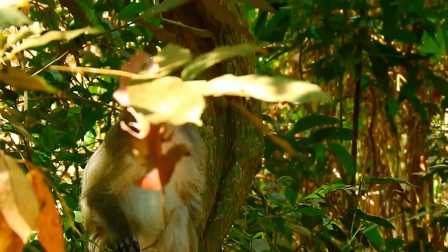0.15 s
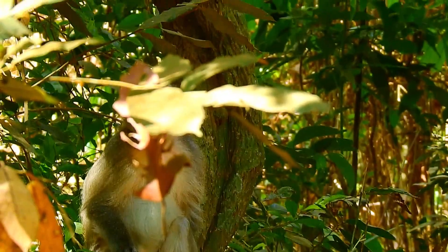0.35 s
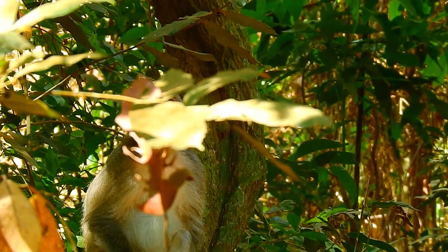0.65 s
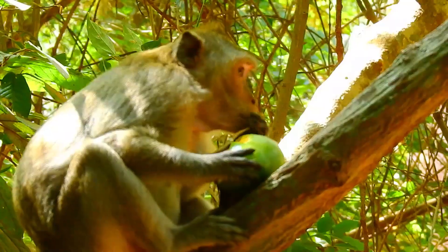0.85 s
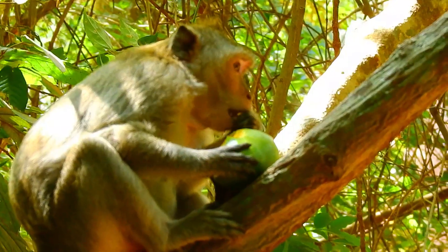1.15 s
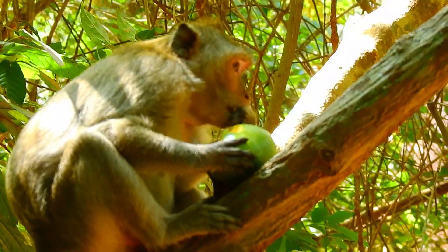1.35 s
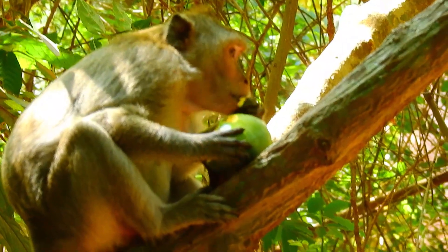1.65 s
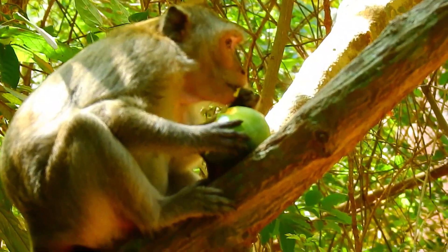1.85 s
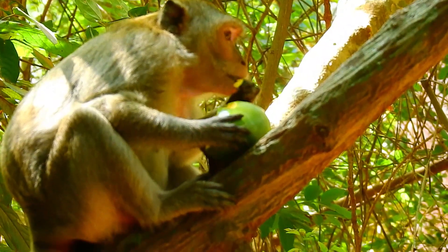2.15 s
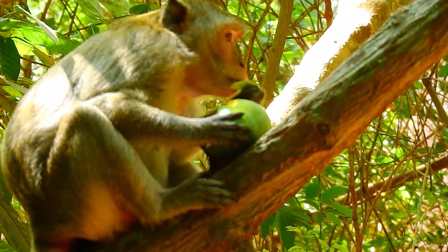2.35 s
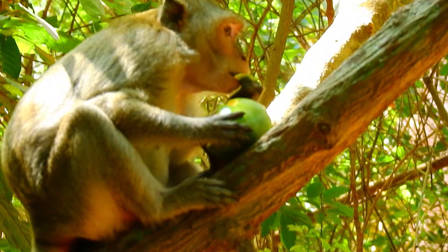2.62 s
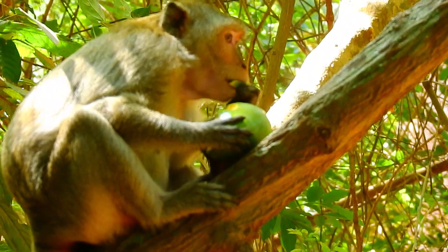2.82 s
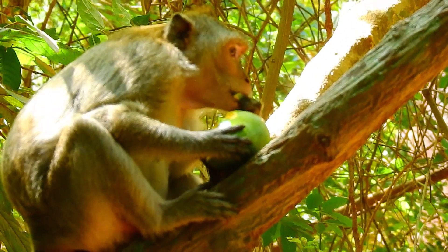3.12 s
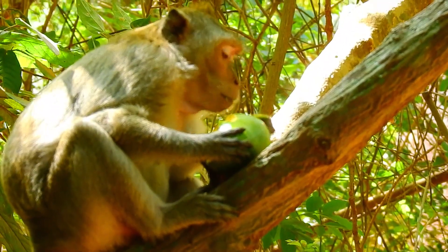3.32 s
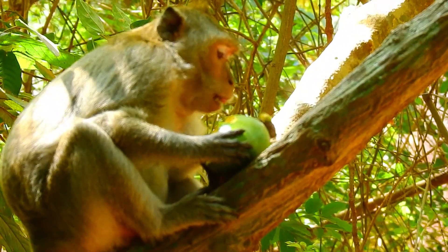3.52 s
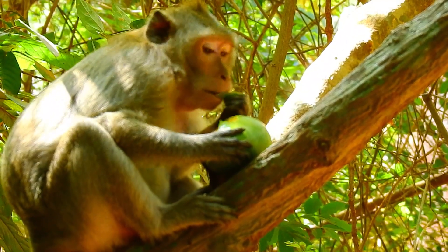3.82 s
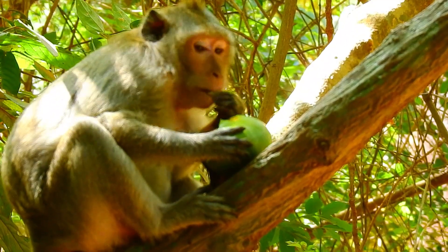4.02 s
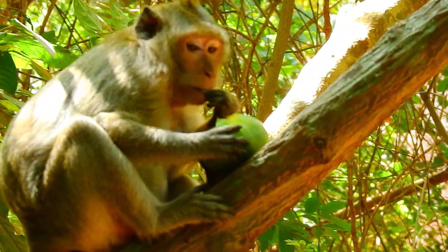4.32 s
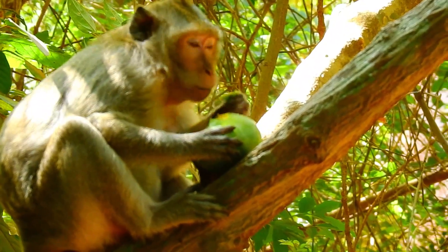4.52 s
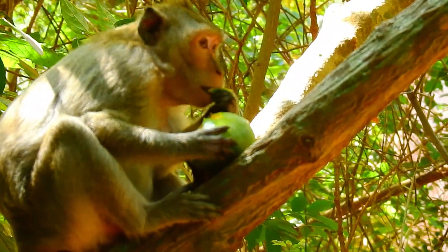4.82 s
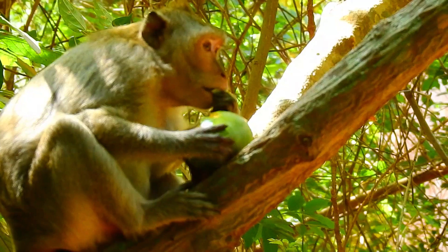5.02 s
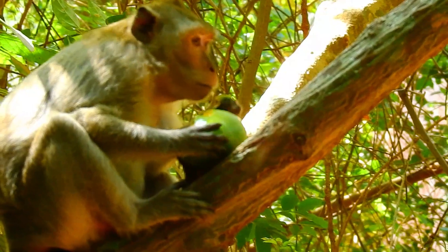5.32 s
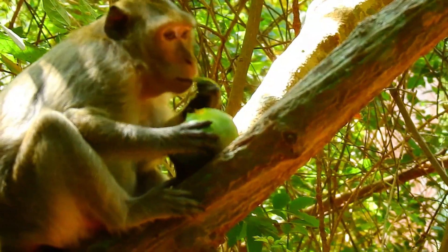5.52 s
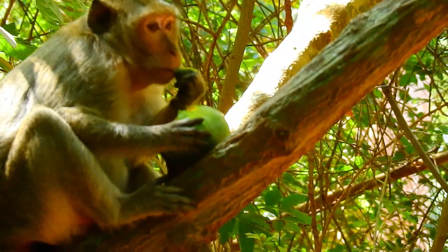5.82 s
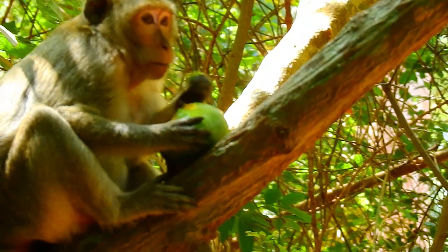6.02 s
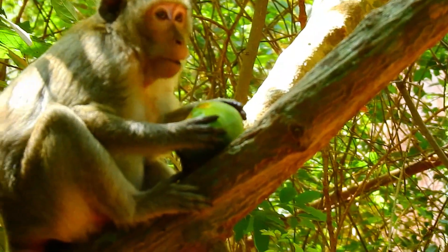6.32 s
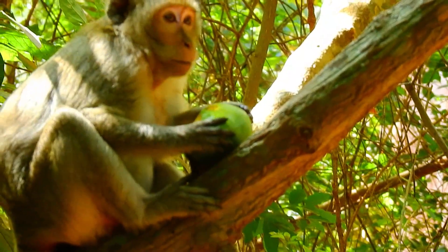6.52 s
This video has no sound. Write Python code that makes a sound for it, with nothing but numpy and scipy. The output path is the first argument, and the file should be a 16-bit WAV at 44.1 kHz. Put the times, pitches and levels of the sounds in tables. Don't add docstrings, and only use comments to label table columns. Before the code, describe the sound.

A dense high cicada drone fills a tropical forest over low road rumble and a thumping engine, with a half-second dropout near the start.

```python
import sys
import numpy as np
from scipy import signal
from scipy.io import wavfile
from scipy.ndimage import uniform_filter1d

SR = 44100
rng = np.random.default_rng(int(sys.argv[2]) if len(sys.argv) > 2 else 0)


def elevation(decibels):
    levels = np.asarray(decibels, float)
    return 10 ** (levels / 20)


def master(y):
    cut = np.clip(np.atleast_2d(y).T, -1, 1)
    pcm = np.round(cut * 32767)
    wavfile.write(sys.argv[1], SR, pcm.astype(np.int16))


N = 293706
T = np.arange(N) / SR

# hz [Hz], correlation [-1..1]
SAME_PORTS = [(60, .998), (200, .995), (320, .95), (600, .97), (1400, .92), (2800, .72), (4000, .5),
              (5500, .3), (7000, -.2), (8500, -.35), (15000, -.15)]
# start_s [s], end_s [s]
SILENT_S = (.2363, .7368)


def evened(x):
    return x / np.sqrt(np.mean(x ** 2) + 1e-20)


def read(points, hz):
    f, value = np.transpose(points)
    return np.interp(np.log(hz + 1), np.log(f + 1), value)


def columns(rows):
    s, *rest = np.transpose(rows)
    return [np.interp(T, s, c) for c in rest]


def during(rows, fade_s=.02):
    inside_s = np.minimum(T - rows[0][0], rows[-1][0] - T)
    return np.clip(inside_s / fade_s + 1, 0, 1)


def drift(rate_hz, count=1, t=T):
    knots = rng.standard_normal((count, int(N / SR * 60) + 2))
    smooth = signal.filtfilt(*signal.butter(2, min(rate_hz / 30, .9)), knots)
    return np.array([np.interp(t * 60, np.arange(len(k)), evened(k)) for k in smooth])


def resonate(x, hz, width_hz):
    return signal.lfilter(*signal.iirpeak(hz, hz / width_hz, SR), x)


def noise(spectrum, size, patchy_db, bins, frames, flicker_db=0., lines=()):
    # hz [Hz], left_minus_right_db [dB]
    lean = [(60, -2), (180, 1.5), (550, -1.0), (1650, -3), (4970, 0.0), (15000, -0.5)]
    steps, hz = 4 * N // size + 5, np.fft.rfftfreq(size, 1 / SR)
    a, b, c, d, patches = rng.standard_normal((steps, len(hz), 5)).T
    patches = uniform_filter1d(patches, round(bins), 0)
    patches = evened(uniform_filter1d(patches, round(frames), 1))
    shape_db = read(spectrum, hz)
    shape_db = shape_db + sum(db / (1 + (2 * (hz - f) / w) ** 2) for f, w, db in lines)

    same = np.clip(read(SAME_PORTS, hz), -1, 1)[:, None]
    left = a + 1j * b
    right = same * left + np.sqrt(1 - same ** 2) * (c + 1j * d)
    z = np.array([left, right])
    z *= elevation(shape_db[:, None] + patchy_db * patches + flicker_db * rng.standard_normal(steps))
    z *= elevation(np.outer([.5, -.5], read(lean, hz)))[:, :, None]
    return evened(signal.istft(z, nperseg=size, noverlap=3 * size // 4)[1][:, :N])


def crowd():
    # hz [Hz], density_db [dB per Hz]
    high_band = [(3710, -45.5), (6300, -7), (6490, -15.5), (7000, 0), (7670, -1.5), (7850, -6.5),
                 (8090, -14.5), (8960, -23), (10400, -32.5), (11800, -33), (12500, -45.5), (14500, -40),
                 (15600, -46)]
    # hz [Hz], density_db [dB per Hz]
    lower_band = [(1530, -25), (2600, -18), (4330, -2), (4950, 3), (5370, -0.5), (5940, 5), (6450, -1),
                  (6600, 7), (8580, -27), (14500, -120)]
    # hz [Hz], width_hz [Hz], lift_db [dB]
    shared_pitches = [(6770, 50, 3), (6868, 30, 4), (7005, 24, 4), (7340, 70, -6), (7420, 45, 5),
                      (7558, 50, 6), (7732, 24, 7), (7820, 90, -6), (8200, 200, 3)]
    # time_s [s], effort_db [dB]
    chorus = [
        (0, -0.24),
        (1.2, -.5),
        (4.2, 0),
        (4.5, -0.96),
        (5.15, -0.6),
        (5.6, 0.3),
        (6.66, 0.04),
    ]
    effort_db = columns(chorus)[0]
    high = noise(high_band, size=4096, patchy_db=3.0, bins=3, frames=14, lines=shared_pitches)
    lower = noise(lower_band, size=4096, patchy_db=3.0, bins=3, frames=14)
    top = signal.sosfiltfilt(signal.butter(3, 9300, 'high', fs=SR, output='sos'), high)
    high = high + (elevation(4 * effort_db) - 1) * top
    return elevation(-23.5 + effort_db) * high + elevation(-29 + 1.5 * effort_db) * lower


def singer(phrase, peak_db, clear):
    # hz [Hz], gain_db [dB]
    abdomen = [(3000, -37), (3300, -27), (3800, 4), (4300, 3), (4700, -15), (5300, -0.5), (6000, -11.5),
               (6600, -36.5)]
    veiled_db, weak_db, clear_step_db = -16, -1.5, -3.5
    fade_db, steady_db = 3.0, 2.6
    wobble, swell_power = .0004, .7

    start_s, length_s, first_hz, last_hz = phrase
    span = (T > start_s) & (T < start_s + length_s)
    t = T[span]
    along = (t - start_s) / length_s
    rate_hz = (first_hz + (last_hz - first_hz) * along) * (1 + wobble * drift(24.9, t=t)[0])
    turns = np.cumsum(rate_hz) / SR

    orders = np.arange(20, 43) / 2
    fades, starts, gaps = drift(11, count=23, t=t), rng.random(23), rng.standard_normal(23)
    buzz = 0
    for k, fade, start, gap in zip(orders, fades, starts, gaps):
        hz = k * (first_hz + last_hz) / 2
        if k in clear:
            partial_db = clear_step_db * clear.index(k) + steady_db * fade
        else:
            partial_db = read(abdomen, hz) + veiled_db + weak_db * (k % 1 > 0) + fade_db * fade
        apart = 0.37 * gap * np.arccos(np.clip(read(SAME_PORTS, hz), -1, 1))
        angle = 2 * np.pi * (k * turns + start)
        buzz = buzz + elevation(partial_db) * np.cos(angle + np.array([[0], [apart]]))
    out = np.zeros((2, N))
    out[:, span] = elevation(peak_db) * np.sin(np.pi * along) ** swell_power * buzz
    return out


def near_cicadas():
    # start_s [s], length_s [s], first_hz [buckles per s], last_hz [buckles per s]
    phrases = [(-.2, .6, 297, 297), (.66, .26, 315, 315), (.66, .45, 293.5, 296), (1.0, 1.25, 296, 313.5),
               (1.0, .32, 297, 299), (1.4, .24, 305.3, 304.3), (1.6, .62, 300.5, 296),
               (2.12, .85, 313.3, 316.3), (2.6, .48, 303.5, 306.2), (2.9, 1.5, 316, 316),
               (3.45, .45, 306, 306.5), (3.8, .7, 306.5, 306), (3.6, .75, 298.3, 296.5),
               (5.3, .65, 307.3, 305), (5.9, .9, 305.5, 305), (5.3, .85, 332.5, 326), (6.1, .8, 326, 325),
               (5.85, .55, 299, 296.5), (5.95, .95, 314.5, 314.5)]
    peaks_db = [-54, -43, -43, -46, -43, -39, -47, -39.5, -40, -50, -38.5, -44, -43, -39.5, -47, -39, -43,
                -40, -42.5]
    clear_orders = [(13, 12), (12,), (12, 15), (16, 12, 15, 14), (13, 14), (13, 17.5), (14, 13),
                    (12, 16, 11), (15, 17.5, 12), (16, 12), (13, 14, 12, 17.5), (12, 13, 15), (14, 13, 17),
                    (13, 18, 17, 19), (17, 18, 13), (13, 14, 16), (13, 16), (14,), (12,)]
    return sum(singer(*phrase) for phrase in zip(phrases, peaks_db, clear_orders))


def tyre_whine(shot_db):
    # hz [Hz], density_db [dB per Hz]
    whine_band = [(1050, -34.5), (1200, 7), (1300, -6.5), (1400, 0), (1550, 5.5), (1680, -8.5), (1850, -38)]
    # nearest_s [s], half_width_s [s], level_db [dB]
    passes = [
        (2.5, 0.95, -56.5),
        (3.6, .3, -61),
        (4.2, .25, -40.5),
        (5.15, .1, -42),
        (5.55, 0.22, -37),
        (6.5, .5, -47.5),
    ]
    near = sum(elevation(db) / (1 + ((T - s) / width_s) ** 4) for s, width_s, db in passes)
    whine = noise(whine_band, size=1024, patchy_db=5.0, bins=4, frames=14, flicker_db=1.5)
    return near * elevation(shot_db) * whine


def road():
    # hz [Hz], density_db [dB per Hz]
    roar_band = [(150, -13.5), (250, -4), (350, -10.5), (653, 1.5), (736, -11), (805, -7.5), (861, -5),
                 (971, -3), (1090, -2.5), (1250, -7.5), (1500, -7.5), (1950, -32.5), (3300, -120)]
    # hz [Hz], density_db [dB per Hz]
    hiss_band = [(760, -42.5), (1300, -12), (1540, -5), (1690, -2.5), (3220, -5), (3600, -0.5),
                 (4680, -31.5), (7920, -120)]
    # hz [Hz], density_db [dB per Hz]
    rumble_band = [(12, -65), (20, -36.5), (34, -28), (49, -5.5), (85, -0.5), (119, 4.5), (166, -2),
                   (206, -7), (356, -30.5), (420, -21.5), (550, -38), (920, -120)]
    # time_s [s], level_db [dB]
    traffic = [
        (0.76, -47),
        (2.42, -44.5),
        (2.91, -39.5),
        (4.47, -37),
        (4.59, -41),
        (5.34, -38.5),
        (6.2, -42.5),
        (6.66, -41),
    ]
    # roar_db, hiss_db, rumble_db, whine_db [dB]
    first_shot_db = (-11, -11, -7.5, -14)
    roar_db, hiss_db, rumble_db, whine_db = np.outer(first_shot_db, T < SILENT_S[0])
    traffic_db = columns(traffic)[0]
    hiss_db = hiss_db - 42 + 0.27 * (traffic_db - traffic_db.mean())

    roar = noise(roar_band, size=1024, patchy_db=2.5, bins=5, frames=14, flicker_db=-2.5,
                 lines=[(1033, 360, 2), (712, 90, 0.72)])
    hiss = noise(hiss_band, size=1024, patchy_db=2.33, bins=12, frames=8, flicker_db=1.0)
    rumble = noise(rumble_band, size=4096, patchy_db=2.0, bins=3, frames=6)
    out = tyre_whine(whine_db) + elevation(traffic_db + roar_db + 1.76) * roar
    return out + elevation(hiss_db) * hiss + elevation(-34 + rumble_db) * rumble


def call(notes, first_db, flutter_db, wobble):
    rise_s, fall_s, trill_hz, trill_db = 0.015, .025, 21.1, 2
    shake, flutter = drift(24, count=2)
    out = np.zeros(N)
    for s, length_s, first_hz, last_hz, db in notes:
        hz = first_hz + (last_hz - first_hz) * np.clip((T - s) / length_s, 0, 1)
        turns = np.cumsum(hz * (1 + wobble * shake)) / SR
        voice = np.cos(2 * np.pi * turns) + elevation(first_db) * np.cos(np.pi * turns)
        trill = trill_db * np.sin(2 * np.pi * trill_hz * (T - s))
        gate = np.clip(np.minimum((T - s) / rise_s, (s + length_s - T) / fall_s + 1), 0, 1)
        out += elevation(db + trill) * gate * np.sqrt(2) * voice
    return elevation(flutter_db * flutter) * out


def forest(x, t60_s=1.0):
    t = np.arange(SR // 2) / SR
    signs = rng.choice([-1., 1.], (2, len(t)))
    taps = signs * (rng.random((2, len(t))) < .04) * elevation(-60 * t / t60_s)
    return signal.fftconvolve(x[None], taps / np.linalg.norm(taps[0]), axes=1)[:, :N]


def birds():
    # start_s [s], length_s [s], first_hz [Hz], last_hz [Hz], level_db [dB]
    cricket = [
        (-.02, .08, 2120, 2110, -53),
        (.09, .12, 2107, 2095, -62),
    ]
    # start_s [s], length_s [s], first_hz [Hz], last_hz [Hz], level_db [dB]
    far_birds = [
        (4.33, 0.24, 1055, 1050, -43),
        (5.34, 0.044, 592, 608, -37.5),
        (5.41, 0.113, 1100, 980, -43),
    ]
    # start_s [s], length_s [s], first_hz [Hz], last_hz [Hz], level_db [dB]
    low_bird = [
        (5.385, .1, 1455, 1495, -40),
        (5.52, .35, 1485, 1475, -41),
        (5.92, .2, 1535, 1555, -40),
        (6.14, .14, 1550, 1505, -37),
        (6.29, .2, 1525, 1550, -43),
        (6.5, .09, 1553, 1558, -34),
        (6.62, .1, 1558, 1562, -34),
    ]
    # start_s [s], length_s [s], first_hz [Hz], last_hz [Hz], level_db [dB]
    high_bird = [
        (5.64, .06, 1600, 1615, -37),
        (5.725, .035, 1612, 1608, -33),
        (5.79, .07, 1635, 1625, -40),
        (5.883, .12, 1598, 1605, -34),
        (6.015, .11, 1605, 1630, -35),
        (6.15, .1, 1620, 1585, -36),
    ]
    calls = call(low_bird, first_db=-18, flutter_db=2.5, wobble=0.007)
    calls += call(high_bird, first_db=-9, flutter_db=3.0, wobble=0.008)
    calls += call(cricket, first_db=-40, flutter_db=2.0, wobble=.006)
    calls += call(far_birds, first_db=-44, flutter_db=3, wobble=0.012)
    return calls + elevation(-12.5) * forest(calls)


def engine():
    # time_s [s], level_db [dB]
    approach = [
        (.75, -48),
        (1.4, -36),
        (3.0, -32.5),
        (3.4, -28.5),
        (4.9, -28),
        (5.2, -31.5),
        (6.0, -32.5),
        (6.66, -34),
    ]
    # order [multiple of the firing rate], level_db [dB]
    exhaust = [(1, -40), (2, -10.5), (3, -8.5), (4, -4), (5, 1.5), (6, 0), (7, -5.5), (8, -13), (9, -15),
               (10, -34), (11, -43)]
    uneven_db, lag_rad = 4.5, 2.92
    rate_hz = 26.05 - .2 * T + .05 * drift(3)[0]
    turns = np.cumsum(rate_hz) / SR + 0.726
    thumps = 0
    for k, db in exhaust:
        thumps = thumps + elevation(db) * np.cos(2 * np.pi * k * turns - lag_rad * np.arctan((k - 5.0) / 1.88))
    firings = 0.34 * np.tanh(rng.standard_normal(200))
    strength = np.interp(turns - .5, np.arange(200), firings)
    level_db = columns(approach)[0] - 1.0 + uneven_db * strength
    return elevation(level_db) * evened(thumps) * during(approach)


def far_motor():
    # time_s [s], hum_hz [Hz], level_db [dB]
    motor = [
        (1.8, 91, -58),
        (2.3, 92, -33.5),
        (2.8, 92, -54),
        (3.4, 93.23, -35.5),
        (4.6, 95, -40),
        (5.4, 91.6, -38.5),
        (6.2, 87.3, -39),
    ]
    hum_hz, hum_db = columns(motor)
    hum = np.cos(2 * np.pi * np.cumsum(hum_hz) / SR)
    return elevation(hum_db + 1.0) * during(motor, fade_s=0.73) * hum


def knocks():
    # start_s [s], peak_db [dB], centre_hz [Hz], width_hz [Hz]
    branch_knocks = [
        (1.699, -27.5, 1609, 700),
        (3.177, -27.5, 2000, 900),
        (4.08, -24, 2012, 900),
        (4.228, -23.5, 1606, 900),
        (5.123, -29, 1780, 811),
    ]
    out = np.zeros(N)
    for s, db, hz, width_hz in branch_knocks:
        puff = (T > s) * np.exp(-abs(T - s) / 0.012) * rng.standard_normal(N)
        out += elevation(db + 8.5) * resonate(resonate(puff, hz, width_hz), hz, width_hz)
    return out


def camera_nudge():
    # start_s [s], thud_db [dB], rustle_db [dB]
    bump = (6.455, -15, -40)
    s, thud_db, rustle_db = bump
    swell = np.exp(-((T - s - .015) / 0.01) ** 2)
    thud = evened(resonate(resonate(rng.standard_normal(N), 190, 140), 190, 140))
    rustle = evened(resonate(resonate(rng.standard_normal(N), 5000, 5000), 5000, 5000))
    return swell * (elevation(thud_db - 9) * thud + elevation(rustle_db + 3) * rustle)


def scene():
    insects = crowd() + near_cicadas()
    machines = road() + engine() + far_motor()
    return insects + machines + birds() + knocks() + camera_nudge()


def top_cut(x):
    return signal.sosfilt(signal.butter(12, 15710, fs=SR, output="sos"), x)


def record(dry):
    heard = (T < SILENT_S[0]) | (T > SILENT_S[1])
    return top_cut(dry * heard)


dry = scene()
out = record(dry)
master(out)
```